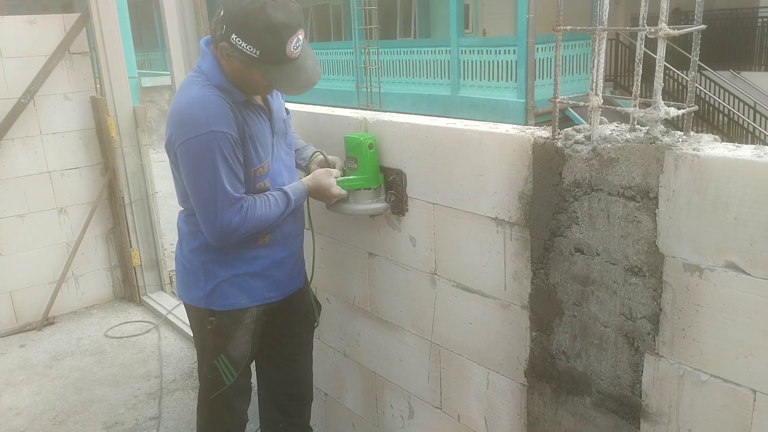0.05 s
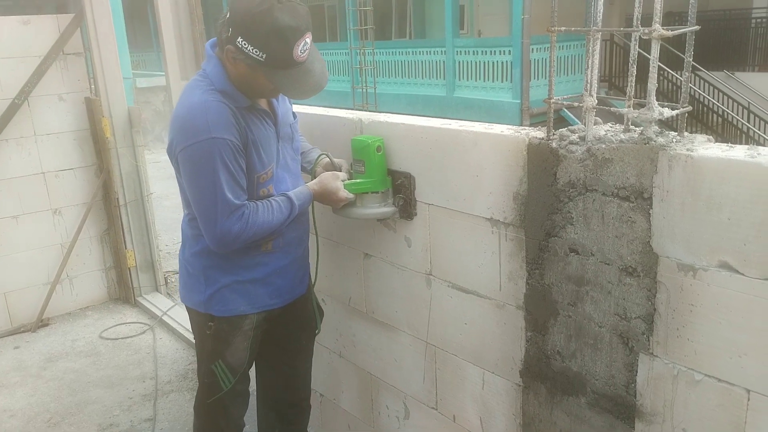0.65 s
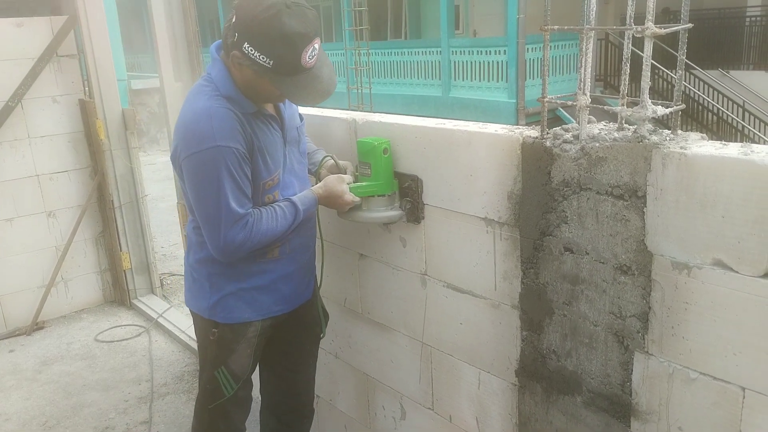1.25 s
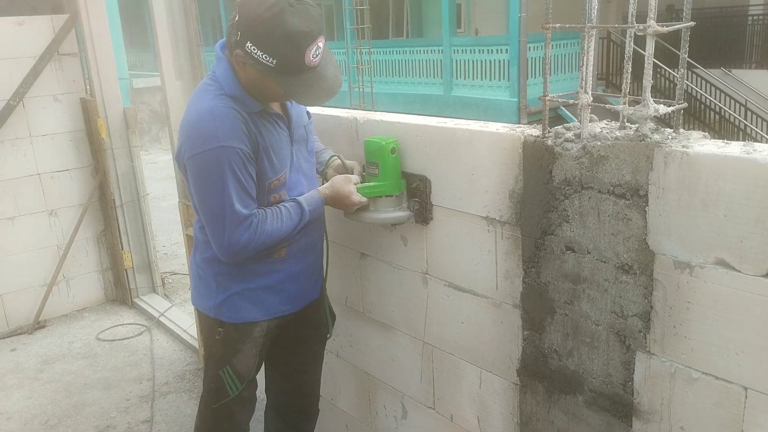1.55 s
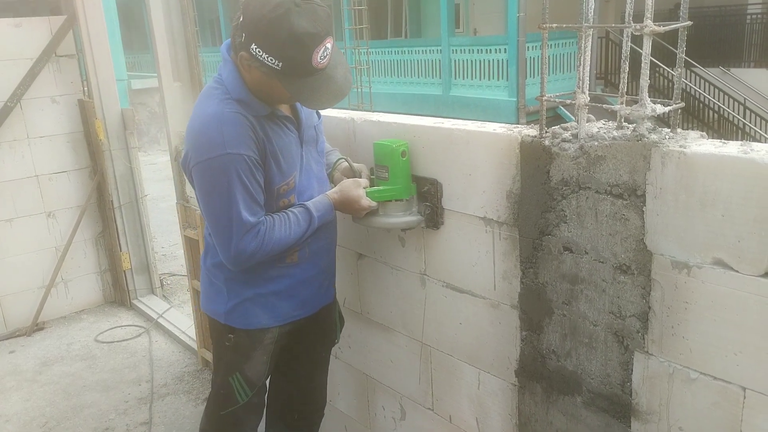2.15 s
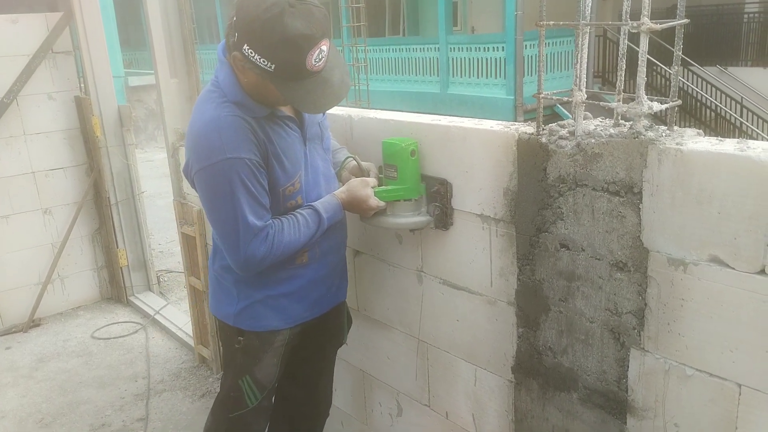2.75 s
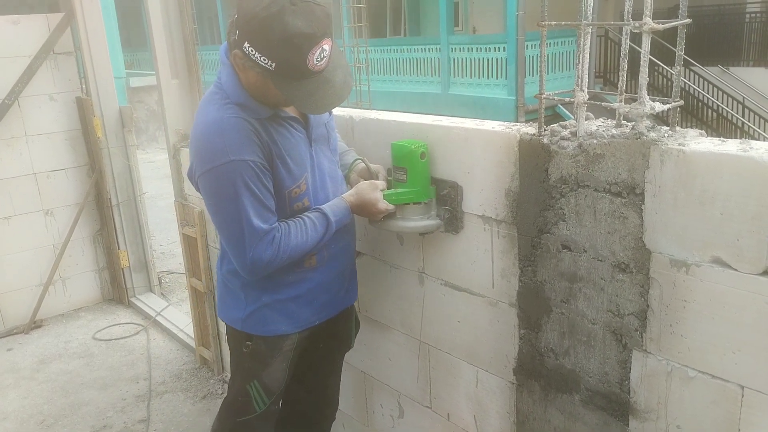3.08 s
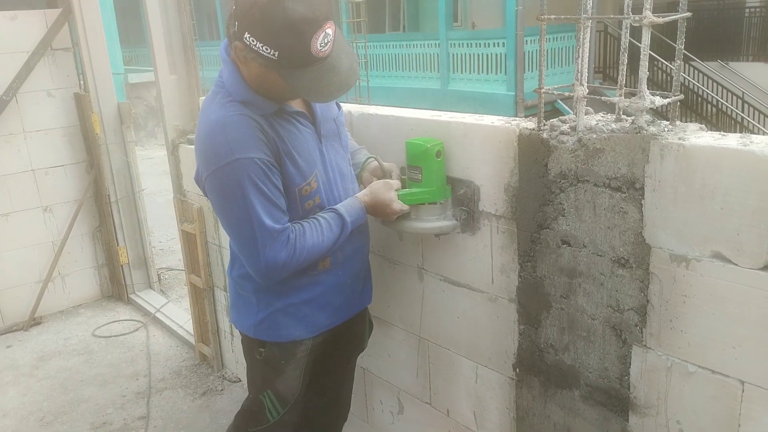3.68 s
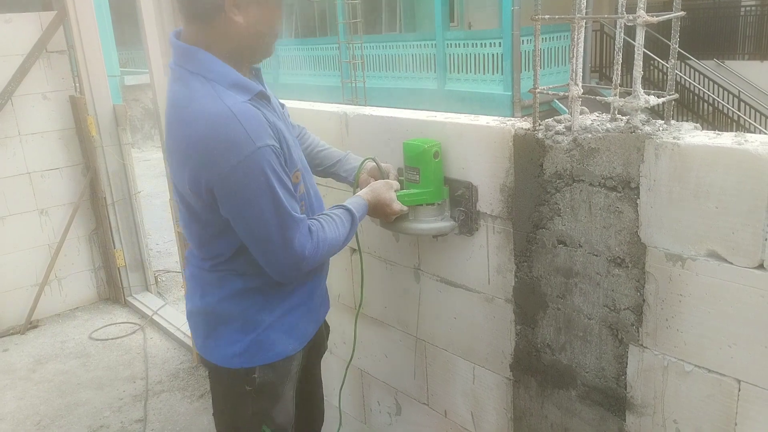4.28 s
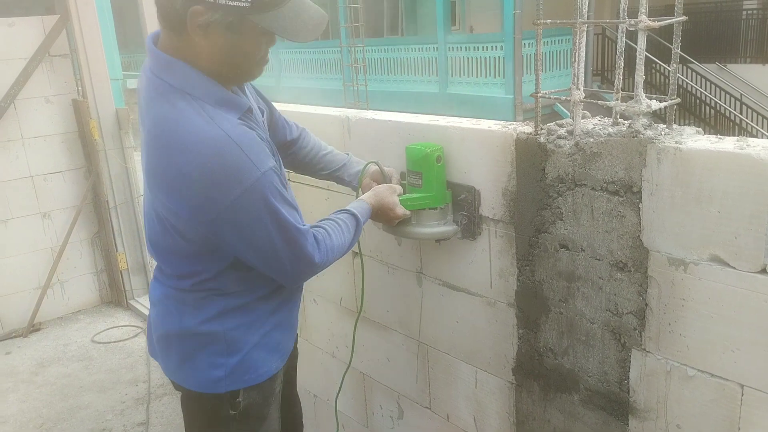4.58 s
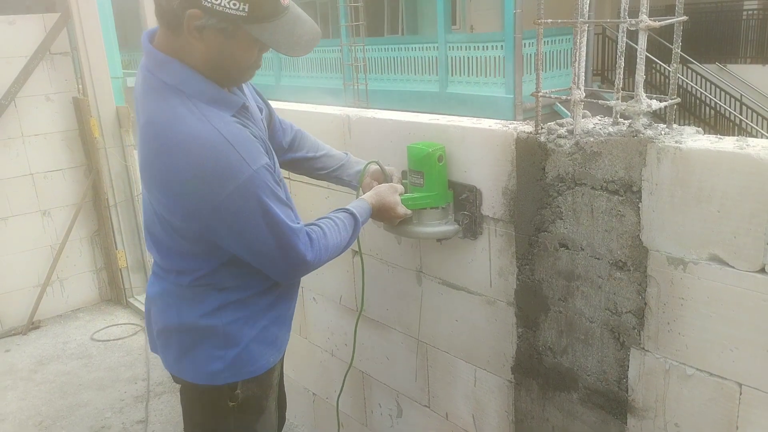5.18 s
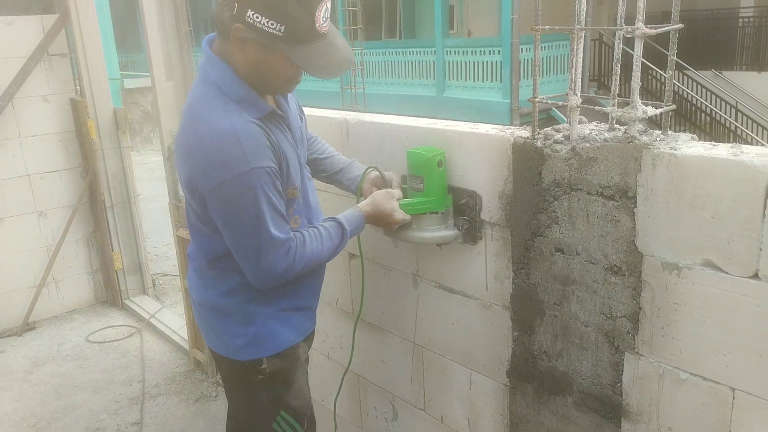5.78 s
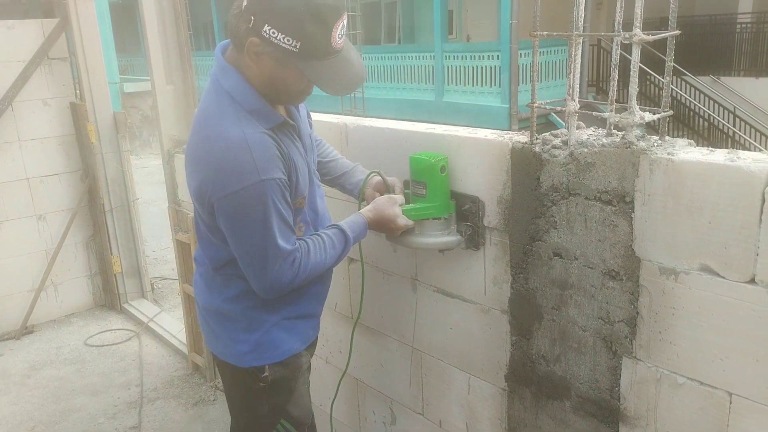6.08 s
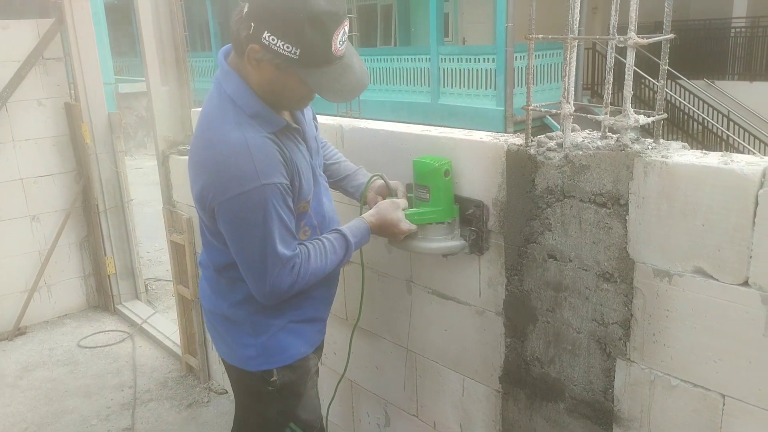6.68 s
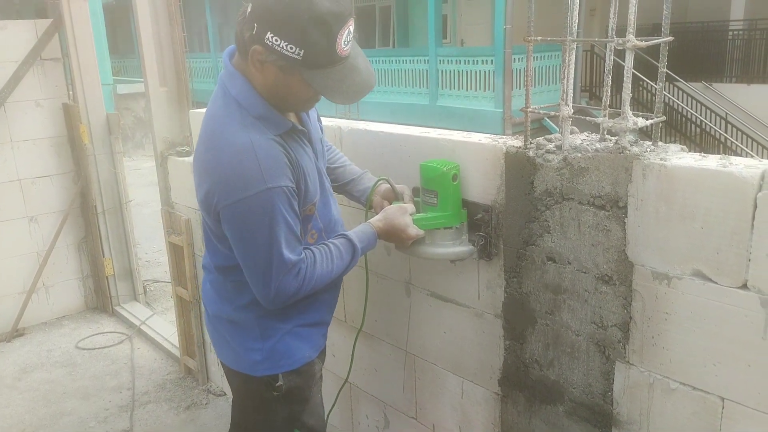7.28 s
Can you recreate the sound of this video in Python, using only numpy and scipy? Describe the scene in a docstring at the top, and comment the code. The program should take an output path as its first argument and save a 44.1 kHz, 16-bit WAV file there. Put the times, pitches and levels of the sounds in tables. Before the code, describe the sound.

A handheld electric disc cutter hisses harshly through a concrete block wall, its whine rising briefly as it eases, then sagging again.

```python
"""First comes the harsh hiss of a handheld electric disc cutter sawing a slot in aerated concrete blocks.
Grit scrapes the rim and sets the blade, guard and slot ringing, while the wall rumbles and the motor hums.
The gears whine low under load, climb when the blade is eased for a while, then sag again.
About a second in, a few puffs of air touch the close, mono microphone."""
import sys
import numpy as np
from scipy import signal
from scipy.fft import rfft, irfft, next_fast_len
from scipy.io import wavfile
from scipy.ndimage import map_coordinates

SR = 44100
rng = np.random.default_rng(int(sys.argv[2]) if len(sys.argv) > 2 else 0)


def master_out(mix):
    """Clip the mix to full scale and print it as 16-bit PCM to the path in sys.argv[1]."""
    frames = np.transpose(np.atleast_2d(mix))
    ceiling = np.clip(frames, -1, 1)
    pcm = np.round(ceiling * 32767).astype(np.int16)
    wavfile.write(sys.argv[1], SR, pcm)


N = 328104
TIME = np.arange(N) / SR
GEAR_TEETH = 44


def from_db(db):
    """Turn decibels into a number to multiply by."""
    return 10 ** (np.asarray(db) / 20)

def rms_one(x):
    """Scale a signal so its average strength (rms) is 1."""
    return x / np.sqrt(np.mean(x ** 2) + 1e-20)

def curve(rows):
    """Join (seconds, value) points with straight lines."""
    return np.interp(TIME, *np.transpose(rows))

def swell(middle_s, half_s):
    """A bell-shaped rise and fall of height 1."""
    return np.exp(-.5 * ((TIME - middle_s) / half_s) ** 2)

def angle_of(hz):
    """The running angle of a changing frequency."""
    return 2 * np.pi * np.cumsum(hz) / SR

def drift(rate_hz):
    """A smooth random wobble, about 1 in size, at roughly this rate."""
    step, warm_up = 16, 4000
    decay = np.exp(-2 * np.pi * step * rate_hz / SR)
    noise = rng.standard_normal(N // step + warm_up + 2)
    slow = signal.lfilter([1], [1, -2 * decay, decay * decay], noise)[warm_up:]
    return np.interp(np.arange(N) / step, np.arange(len(slow)), rms_one(slow))

def lift_db(hz, peaks):
    """How much resonances (pitches a thing likes to ring at) boost each frequency."""
    return sum(lift / (1 + (2 * (hz - centre) / width) ** 2) for centre, width, lift in peaks)

def coloured(x, spectrum, peaks=()):
    """Give x a tone colour and resonances, at strength 1."""
    size = next_fast_len(N)
    hz = np.maximum(np.fft.rfftfreq(size, 1 / SR), 1)
    point_hz, point_db = np.transpose(spectrum)
    db = np.interp(np.log(hz), np.log(point_hz), point_db, left=-80, right=-80)
    shaped = rfft(x, size) * from_db(db + lift_db(hz, peaks))
    return rms_one(irfft(shaped, size)[:N])

def grit(per_s, spread_db):
    """Random hits from grains of uneven size."""
    hits = rng.random(N) < per_s / SR
    return hits * rng.standard_normal(N) * from_db(spread_db * rng.standard_normal(N))

def ringing(hz, width_hz, flicker_db, wander):
    """A note kept ringing by countless hits; uneven contact makes it flicker and wander."""
    angle = angle_of(hz * (1 + wander * drift(5)))
    ring = drift(width_hz) * np.cos(angle) + drift(width_hz) * np.sin(angle)
    return rms_one(ring * from_db(flicker_db * drift(6)))

def singing(rows, width_hz, flicker_db, wander):
    """Ringing notes that each swell up and die away."""
    return sum(from_db(db) * swell(s, half) * ringing(hz, width_hz, flicker_db, wander)
               for s, half, hz, db in rows)


# Echoes off the wall, worker and floor. Each row: delay in milliseconds, level in dB.
ECHOES = [(1.7, -13), (3.1, -16), (4.9, -22.5), (7.3, -15.5), (11.2, -19), (17.5, -14)]

def reflected(x, sway_ms):
    """Add close echoes, whose delays sway as the tool moves."""
    out = x
    for delay_ms, db in ECHOES:
        lag = (delay_ms + sway_ms * drift(.35)) * SR / 1000
        out = out + from_db(db) * map_coordinates(x, [np.arange(N) - lag], order=2)
    return out


# Tone colours of the hiss and the dust. Each row: frequency in Hz, relative level in dB.
HISS_COLOUR = [(4500, -29), (5600, -20), (6400, -13), (7100, -9), (7800, -2), (8600, -0.5), (9800, -4),
               (10700, -8.5), (12000, -9.5), (13200, -15.5), (14300, -15.5), (15600, -20.5)]
DUST_COLOUR = [(9500, 0), (11000, 6), (13700, -3), (15600, -6)]
# The steel's resonances. Each row: frequency in Hz, width in Hz, boost in dB.
BLADE_PEAKS = [(7050, 250, 1.5), (7380, 160, 1.5), (12350, 140, 2.5), (12950, 140, 3), (13750, 250, 2.5)]
# Dust flies from the slot. Each row: middle in seconds, half length in seconds, relative level in dB.
DUST_SPRAYS = [(1.202, 0.22, -12), (3.55, .2, -9), (4.7, .5, -10), (6.0, 0.63, -6)]
# The blade's notes. Each row: pitch in Hz, relative level in dB when eased, then under full load.
BLADE_NOTES = [(7930, -9.5, -16), (8390, -7, -14.5), (9010, -12, -14.5), (9790, -14.5, -18),
               (10670, -14.5, -23), (11650, -26, -20.5)]
# The steel sings out briefly; the rows near 4 kHz are pings from the guard. Each row: middle in seconds, half
# length in seconds, pitch in Hz, relative level in dB.
SQUEALS = [(.05, .18, 9490, -16), (.3, 0.44, 8680, -14), (.85, 0.54, 4400, -19), (1.3, .2, 9290, -12),
           (1.5, .3, 3990, -20), (1.798, 0.24, 9000, -9), (2.45, 0.46, 3950, -17.5),
           (2.6, 0.35, 10020, -11), (2.68, .2, 8500, -13), (2.95, .22, 9140, -10), (3.35, 0.13, 8480, -9.5),
           (3.75, 0.1, 7930, -6.5), (4.198, .18, 8330, -6.5), (4.55, 0.098, 7940, -12),
           (6.1, 0.31, 4010, -23), (6.721, 0.12, 8540, -6)]

def blade(turn, strain, grip_db):
    """Grains scrape the rim so it hisses and rings; the disc's wobble throbs once a turn."""
    throb_db = (1 - .9 * strain) * np.cos(turn) + 0.4 * np.cos(2 * turn) + 0.54 * drift(27)
    hiss = from_db(-2.5) * coloured(grit(30000, spread_db=1.5), HISS_COLOUR, BLADE_PEAKS)
    spray = sum(from_db(db) * swell(s, half) for s, half, db in DUST_SPRAYS)
    dust = from_db(-4.5) * spray * coloured(rng.standard_normal(N), DUST_COLOUR, BLADE_PEAKS)
    sharp = 1 + .04 * np.exp(-TIME / 1.2)  # the notes start high and settle as the rim sinks in
    ring = sum(from_db(eased + (loaded - eased) * strain)
               * ringing(hz * sharp, width_hz=100, flicker_db=1.3, wander=.004)
               for hz, eased, loaded in BLADE_NOTES)
    squeal = singing(SQUEALS, width_hz=54, flicker_db=0.5, wander=.004)
    steel = hiss + dust + from_db(-0.54) * (ring + squeal)
    level_db = -11.5 + 1.97 * strain + 0.88 * grip_db + 0.05 * TIME  # creeps up as the slot deepens
    return from_db(level_db + throb_db) * reflected(steel, sway_ms=0.0904)


# Tone colours of the guard and the gearcase. Each row: frequency in Hz, relative level in dB.
RASP_COLOUR = [(1900, -7), (2400, 5.5), (2900, 0), (3600, 0.5), (4150, 2.5), (4550, 4), (5200, 0),
               (6200, -3.5), (8000, -31)]
RATTLE_COLOUR = [(1100, -44), (1400, -29), (1500, 0), (1800, -1.5), (2250, -1), (2550, -20), (3200, -3.5)]
# Their resonances. Each row: frequency in Hz, width in Hz, boost in dB (minus is a dip).
GUARD_PEAKS = [(3250, 110, 0.5), (3436, 100, 7), (3800, 110, 1), (3860, 270, 5.5), (4260, 250, 2)]
CASE_PEAKS = [(1476, 22, 11), (1820, 130, 4.5), (1900, 80, -6.8), (1986, 99, 4.5)]
# The guard's notes. Each row: pitch in Hz, relative level in dB when eased, then under full load.
GUARD_NOTES = [(3540, -14, -17.5), (3875, -19, -16.5), (4360, -31, -12)]
# The rim snags on harder grains. Each row: time in seconds, boost to the rattle in dB.
SNAGS = [(1.58, 3.5), (2.28, 0.5), (2.67, 5), (3.16, 3), (3.87, 4), (4.15, 3), (6.465, 5), (7.14, 3.5)]

def guard_and_gearcase(strain, grip_db):
    """The scraping makes the guard rasp and the gearcase rattle; snags jolt them both."""
    snag_db = sum(db * swell(s, half_s=0.016) for s, db in SNAGS)
    rasp = from_db(-0.5) * coloured(grit(16000, spread_db=0.5), RASP_COLOUR, GUARD_PEAKS)
    ring = sum(from_db(eased + (loaded - eased) * strain)
               * ringing(hz, width_hz=80, flicker_db=0.5, wander=.004)
               for hz, eased, loaded in GUARD_NOTES)
    guard_db = -22.5 + 1.34 * strain + 0.73 * grip_db - 0.03 * TIME + 0.37 * snag_db
    rattle = coloured(grit(9000, spread_db=1.0), RATTLE_COLOUR, CASE_PEAKS)
    rattle_db = -26.2 + 3.5 * strain + 0.66 * grip_db - 0.0159 * TIME + snag_db
    return reflected(from_db(guard_db) * (rasp + ring), sway_ms=0.096) + from_db(rattle_db) * rattle


# The growl's tone colour. Each row: frequency in Hz, relative level in dB.
GROWL_COLOUR = [(250, -25), (420, -13), (520, -9.5), (630, 1), (850, -1.5), (1080, -3.5), (1300, 0.5),
                (1450, -3), (1900, -39)]
# The slot's resonances. Each row: frequency in Hz, width in Hz, boost in dB.
SLOT_PEAKS = [(756, 20, 1.5), (1187, 72, 2.2)]
# Hollow groans. Each row: middle in seconds, half length in seconds, pitch in Hz, relative level in dB.
GROANS = [(.3, 0.29, 928, -4.5), (1.3, 0.44, 942, -9), (.68, 0.32, 724, -2), (1.47, 0.18, 780, -7),
          (1.8, 0.37, 719, -4.5), (2.47, 0.13, 780, -9), (2.84, 0.11, 718, -1), (3.6, 0.14, 866, -7.5)]
# How loud the slot is. Each row: time in seconds, base level in dB.
SLOT_LEVEL = [(0.0, -30), (0.29, -29), (0.81, -31), (1.88, -27.5), (2.28, -29), (2.9, -27), (3.11, -30.5),
              (3.6, -30), (4.06, -33), (4.89, -30), (6.09, -33), (6.67, -30), (6.73, -32.5), (7.44, -30.5)]

def slot(grip_db):
    """Scraping growls in the slot, whose air groans while the cut is shallow."""
    growl = from_db(-1) * coloured(grit(9000, spread_db=0.5), GROWL_COLOUR, SLOT_PEAKS)
    groans = singing(GROANS, width_hz=20, flicker_db=0, wander=0.00734)
    return from_db(curve(SLOT_LEVEL) + 0.69 * grip_db) * (growl + groans)


# The rumble's tone colour. Each row: frequency in Hz, relative level in dB.
RUMBLE_COLOUR = [(40, -22), (90, -3), (135, -7.5), (190, 0), (235, -2.5), (270, -3), (330, -8.5),
                 (450, -11.5), (800, -33)]
# How loud the rumble is. Each row: time in seconds, base level in dB.
RUMBLE_LEVEL = [(0.0, -45), (0.25, -42.5), (0.87, -44), (1.16, -37.5), (2.13, -44), (2.32, -40.5),
                (3.79, -46.5), (3.85, -42), (4.0, -46.5), (5.41, -41), (5.51, -45), (7.44, -45)]
# Low drones. Each row: middle in seconds, half length in seconds, pitch in Hz, level in dB.
DRONES = [(.45, .3, 175, -43), (1.2, 0.18, 201.2, -42), (2.401, 0.32, 270, -41), (3.396, .17, 200, -42),
          (3.89, 0.063, 399, -42.5), (5.2, 0.23, 178, -43.5)]

def wall():
    """The wall rumbles with the cut, and drones now and then under the tool's pressed base plate."""
    rumble = from_db(curve(RUMBLE_LEVEL) + 2) * coloured(rng.standard_normal(N), RUMBLE_COLOUR)
    return rumble + singing(DRONES, width_hz=7.5, flicker_db=0.2, wander=0.0041)


# Housing resonances swell the whine as it passes. Each row: frequency in Hz, width in Hz, boost in dB.
HOUSING_PEAKS = [(1540, 79, 7.5), (2502, 180, 6)]
# The load on the teeth shifts. Each row: middle in seconds, half length in seconds, change in dB.
SURGES = [(.9, .08, -2), (1.55, .15, 3), (2.203, .1, -0.5), (2.7, 0.22, -2.5), (3.25, 0.24, 2.5),
          (3.946, 0.11, -6), (4.13, 0.036, 6), (4.35, 0.065, -7), (4.523, 0.076, 7.5), (4.934, .05, -4.5),
          (5.138, 0.089, 2), (5.79, .04, 3.5), (5.92, .04, -3), (6.1, 0.079, 3.5), (6.577, 0.04, 12)]

def gear_whine(gear_hz, strain):
    """Gear teeth whine, pressing harder once a turn; under strain they meet unevenly and sound ragged."""
    tooth_angle = angle_of(gear_hz * (1 + 0.002 * drift(10.8)))
    turn = tooth_angle / GEAR_TEETH
    shake = (0.67 + 0.5 * strain) * drift(57) + 0.52 * np.sin(turn)
    flutter = 1 + 0.85 * (1 - strain) * np.sin(turn)
    surge_db = sum(db * swell(s, half) for s, half, db in SURGES)
    ragged_db = (1.6 + strain) * drift(28)
    whine_db = -27 + lift_db(gear_hz, HOUSING_PEAKS) - 4.4 * strain + surge_db + ragged_db
    return from_db(whine_db) * flutter * np.cos(tooth_angle + shake)


# The stirred air's tone colour. Each row: frequency in Hz, relative level in dB.
RUSH_COLOUR = [(250, -40), (400, -12), (490, 1), (590, 4), (720, -8.5), (1000, -6)]

def air_rush(from_s=4.34, to_s=5.5, fade_s=0.049):
    """The disc stirs the air in the slot, louder while it is eased and spins fast."""
    eased = .5 * (np.tanh((TIME - from_s) / fade_s) - np.tanh((TIME - to_s) / fade_s))
    return (from_db(-44) + from_db(-39.5) * eased) * coloured(rng.standard_normal(N), RUSH_COLOUR)


# How loud the hum's lower note is. Each row: time in seconds, base level in dB.
HUM_LEVEL = [(0.0, -50), (0.93, -49), (1.06, -38), (2.2, -52), (2.3, -45), (3.19, -52.5), (3.96, -39),
             (4.89, -51), (6.9, -40.5), (6.96, -49), (7.36, -41.5), (7.44, -52)]

def motor_hum(mains_hz=50):
    """The motor hums at two and four times the frequency of its power supply."""
    angle = angle_of(np.full(N, 2 * mains_hz)) + .15 * drift(4.4)
    return from_db(curve(HUM_LEVEL) + 2.5) * np.sin(angle) + from_db(-48) * np.sin(2 * angle)


# The draught's tone colour. Each row: frequency in Hz, relative level in dB.
DRAUGHT_COLOUR = [(10, -8), (30, -4), (70, 0.5), (100, -5), (150, -7), (400, -46)]
# Puffs of air. Each row: middle in seconds, half length in seconds, level in dB.
PUFFS = [(0.975, 0.033, -36), (1.087, 0.025, -29.5), (1.21, 0.035, -38), (1.4, .15, -49), (1.77, 0.03, -39)]

def air_on_microphone():
    """A faint, slowly dying draught and a few puffs brush the microphone."""
    draught = from_db(-45.5 - 0.9 * TIME)
    puffs = sum(from_db(db) * swell(s, half) for s, half, db in PUFFS)
    return (draught + puffs) * coloured(rng.standard_normal(N), DRAUGHT_COLOUR)


# The tool's speed, heard as the whine. Each row: time in seconds, pitch in Hz.
GEAR_PITCH = [(0, 1540), (.65, 1536), (2.8, 1532), (3.35, 1569), (3.6, 1616), (3.8, 1752), (4.13, 2068),
              (4.48, 2400), (4.62, 2473), (4.87, 2545), (5.02, 2528), (5.5, 2596), (5.72, 2515),
              (5.88, 2423), (6.12, 2030), (6.57, 1778), (6.8, 1700), (7.44, 1640)]
# The rim digs in (+) or slips (-). Each row: middle in seconds, half length in seconds, grip in dB.
GRIPS = [(0, 0.0085, 3), (.94, 0.035, -3.5), (1.047, 0.048, 2.2), (1.66, 0.072, .8), (2.714, 0.046, 1.5),
         (3.077, 0.037, -3.5), (3.224, 0.033, -3), (3.31, .02, 1.5), (3.48, .025, 1.2), (3.592, .03, -0.2),
         (3.72, .02, 0.5), (3.783, 0.024, -3), (3.865, .015, 3), (3.922, 0.045, -4.5), (4.27, 0.041, -2.3),
         (4.59, 0.074, 0.8), (4.726, .04, -2), (4.909, 0.063, 1), (5.07, 0.037, -4), (5.14, 0.014, 3.5),
         (5.24, 0.017, -3), (5.31, .03, 1.7), (5.53, 0.022, -3), (5.586, .02, 1), (5.644, .02, -4.5),
         (5.775, .045, 3), (5.877, 0.023, -0.7), (6.01, 0.044, 1.8), (6.11, .025, -2), (6.28, 0.072, 1.2),
         (6.757, .025, -3)]

def scene():
    """Speed and grip shape the cutting sounds; both channels carry the same mix."""
    gear_hz = curve(GEAR_PITCH)
    strain = (gear_hz.max() - gear_hz) / np.ptp(gear_hz)  # 0 when eased, 1 under full load
    grip_db = sum(db * swell(s, half) for s, half, db in GRIPS)
    turn = angle_of(gear_hz / GEAR_TEETH)  # the disc's angle
    judder = from_db(0.11 * np.cos(turn) + 0.94 * drift(15))
    steel = blade(turn, strain, grip_db)
    scraping = judder * (guard_and_gearcase(strain, grip_db) + slot(grip_db))
    cut = steel + scraping + wall()
    machine = gear_whine(gear_hz, strain) + air_rush() + motor_hum()
    return np.tile(cut + machine + air_on_microphone(), (2, 1))

def record(dry):
    """Flatten the tallest peaks, then cut away the highest treble."""
    overloaded = np.clip(dry, -.92, .92)
    low_pass = signal.firwin(501, cutoff=15650, fs=SR)
    return signal.fftconvolve(overloaded, low_pass[None], mode="same", axes=1)


dry = scene()
out = record(dry)
master_out(out)
```